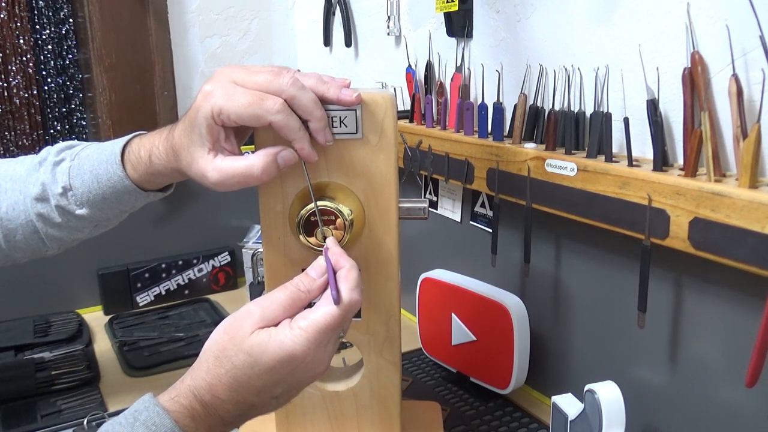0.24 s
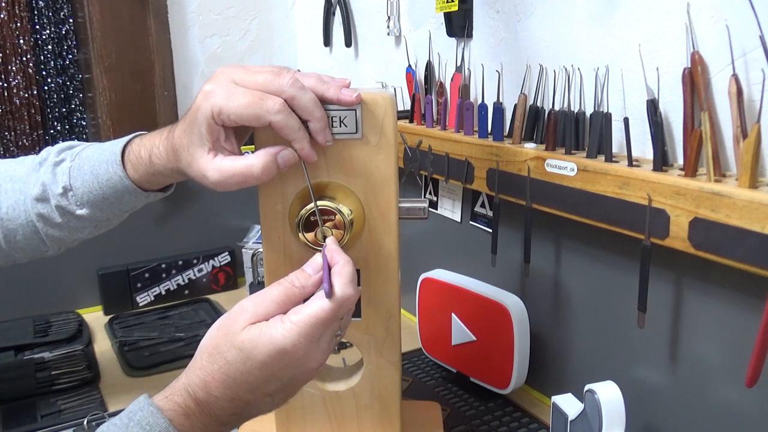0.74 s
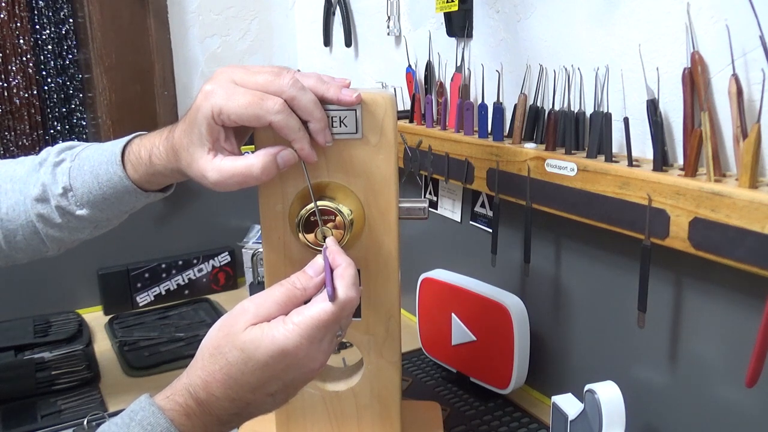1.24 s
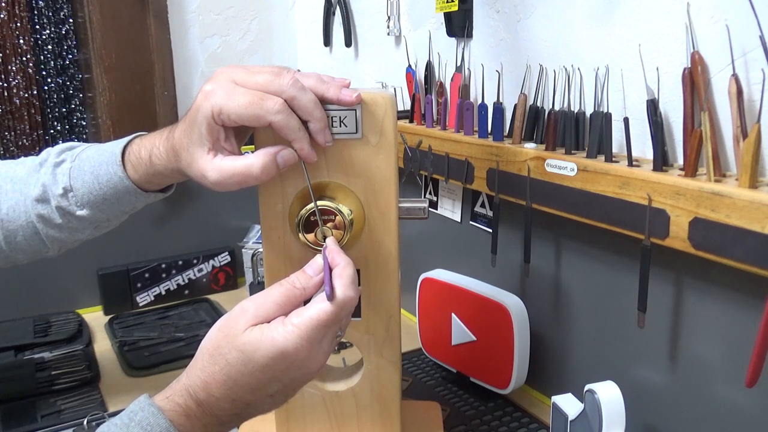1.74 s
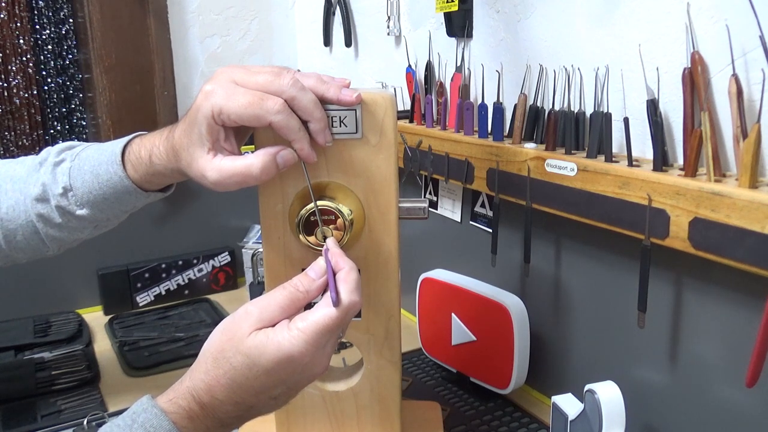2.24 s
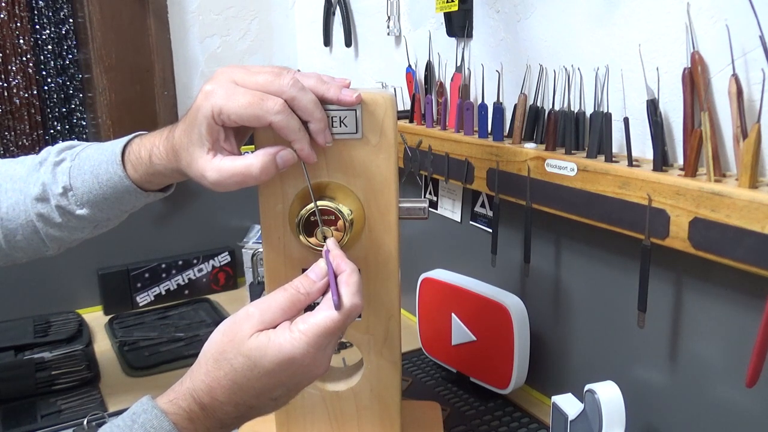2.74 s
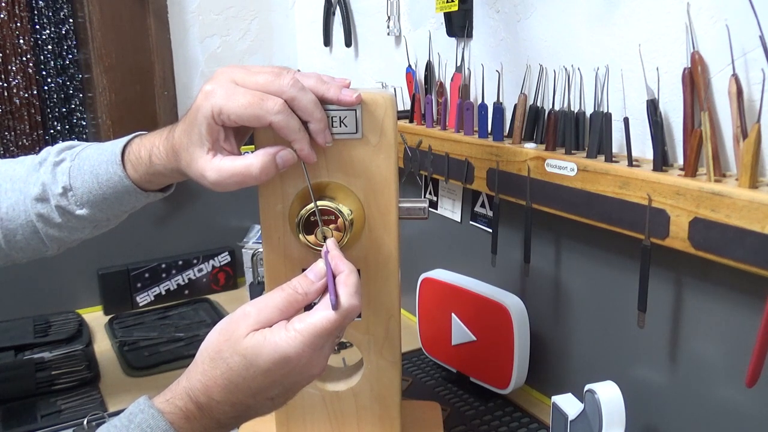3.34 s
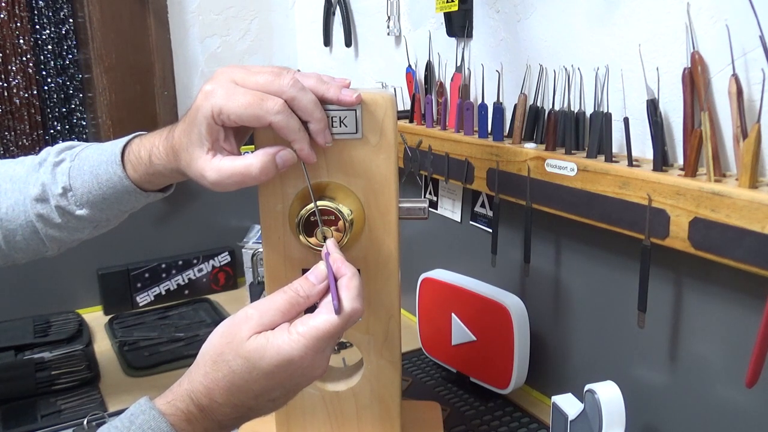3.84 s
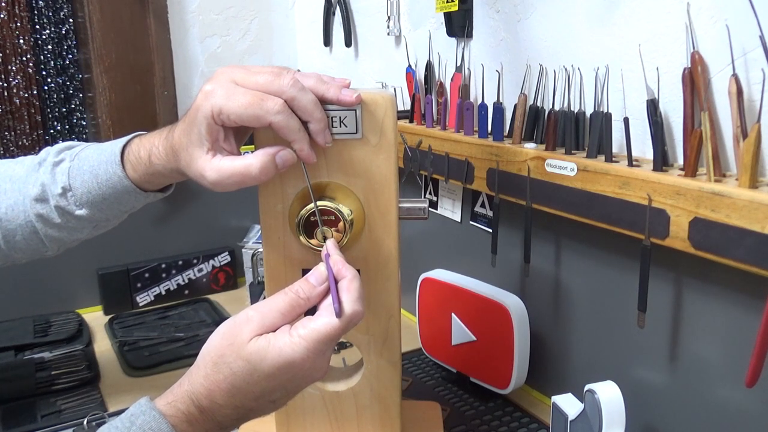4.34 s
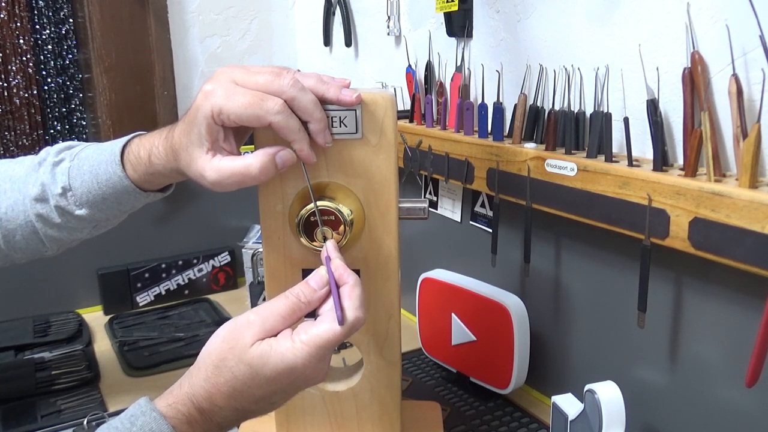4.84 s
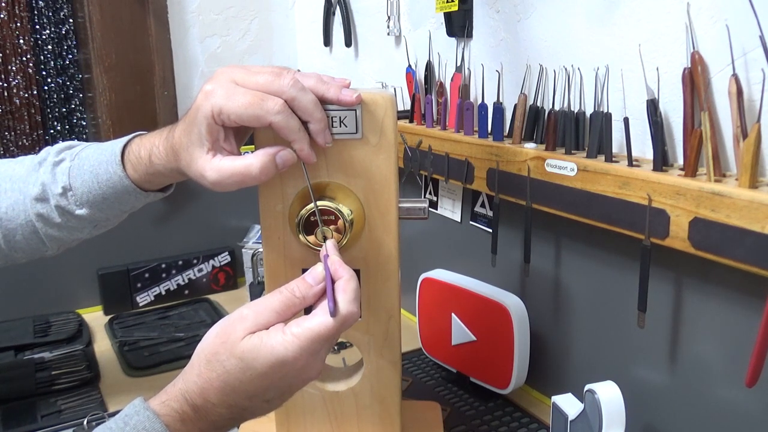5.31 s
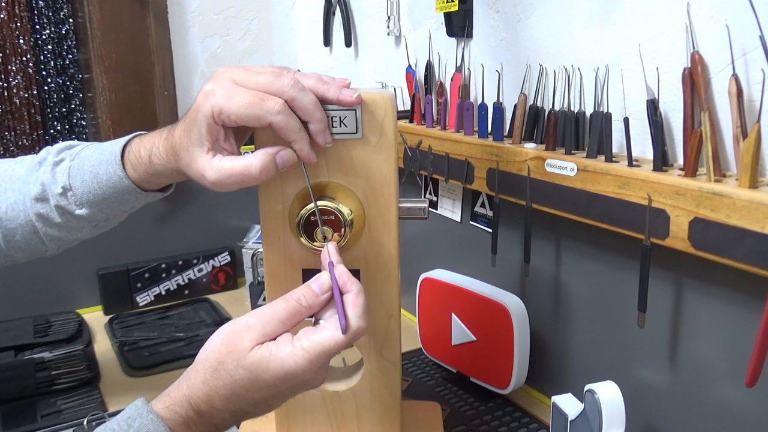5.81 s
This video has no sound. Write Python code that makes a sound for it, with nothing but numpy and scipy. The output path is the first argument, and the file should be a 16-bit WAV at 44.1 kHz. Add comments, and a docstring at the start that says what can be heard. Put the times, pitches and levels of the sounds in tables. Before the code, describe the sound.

A steel pick works the pins of a brass door lock in a wooden stand, close to one microphone in a small, fairly dry workshop. Faint room hiss runs throughout. A light, bright click comes at about 0.6 seconds, then four quick knocking clicks between 1.3 and 1.5 seconds. Each snap combines a short knock of the lock body with a very brief steel ring, and harder ones thump the stand. A soft knock at 2.4 seconds leads to a sharp click at 2.6 and a smaller one at 3. The pick rubs and scrapes faintly in the gaps, just before a stronger snap at 3.5 seconds. By far the loudest snap lands at 4.85 seconds. Afterwards the hiss drops a little and slowly recovers, with a few small clicks around 5.1 seconds and faint ticks near 5.8 and 6.

```python
"""A small workshop, one microphone close to a brass door lock in an upright wooden stand.
Room air hisses throughout. At 0.55 s a steel pick nudges a pin and the lock body knocks softly.
From 0.6 s pins snap: each knocks the body, rings the steel tools and thumps the stand.
From 2.3 s the pick also rubs and scrapes faintly between snaps. At 4.85 s comes the hardest snap:
the limiter ducks and recovers slowly, so the hiss and the last few clicks stay lower after it."""
import sys
import numpy as np
from scipy import signal
from scipy.fft import rfft, irfft, next_fast_len
from scipy.io import wavfile
from scipy.ndimage import uniform_filter1d

SR = 44100
rng = np.random.default_rng(int(sys.argv[2]) if len(sys.argv) > 2 else 0)


def unload_wav(signal):
    """Save mono or channel-first audio to the path in sys.argv[1] as 16-bit WAV at rate SR, clipped to [-1, 1]."""
    wavfile.write(
        sys.argv[1],
        SR,
        np.round(np.clip(np.atleast_2d(signal).T, -1, 1) * 32767).astype(np.int16),
    )


N = 267819
T = np.arange(SR // 3) / SR  # time inside one click or stroke
FREQS = np.fft.rfftfreq(len(T), 1 / SR)


def amp(db):
    """Decibels to gain."""
    return 10 ** (np.asarray(db) / 20)


def unit(x):
    """Scale to rms 1."""
    return x / np.sqrt(np.mean(x ** 2) + 1e-20)


def along(points, hz):
    """Read (f/Hz, value) points on a log frequency axis."""
    f, v = np.transpose(points)
    return np.interp(np.log(hz + 1), np.log(f + 1), v)


def coloured(x, points):
    """Causal (minimum-phase) filter through (f/Hz, gain/dB) points."""
    m = 2 * next_fast_len(len(x))
    gain = amp(along(points, np.fft.rfftfreq(m, 1 / SR)))
    cepstrum = irfft(np.log(gain), m)
    cepstrum[1:m // 2] *= 2
    cepstrum[m // 2 + 1:] = 0
    return irfft(rfft(x, m) * np.exp(rfft(cepstrum)), m)[:len(x)]


def add(track, s, sound):
    """Mix a sound into the track at time s."""
    part = track[max(round(s * SR), 0):][:len(sound)]
    part += sound[:len(part)]


def ring(modes, scatter_db, detune):
    """Damped modes, struck anew; neighbours swing in opposite senses, so the ring swells and beats."""
    sound = np.zeros(len(T))
    for k, (hz, db, t60) in enumerate(modes):
        decay = amp(db + scatter_db * rng.standard_normal() - 60 * T / t60)
        pitch_hz = hz * (1 + detune * rng.standard_normal())
        sound += (-1) ** k * decay * np.sin(2 * np.pi * pitch_hz * T)
    return sound


# spectrum of the workshop's air: f/Hz, relative level/dB
AIR_SPECTRUM = [(12, -41.5), (20, -5.5), (43, -3), (91, -0.5), (248, -3.5), (388, -5.5), (422, -6.5),
                (642, -8.5), (1000, -12.5), (1090, -13), (1220, -12), (1570, -15.5), (4060, -20),
                (14300, -24), (16000, -27.5)]
def room_air(level_db=-67.5):
    """Steady room tone at the microphone."""
    return amp(level_db) * unit(coloured(rng.standard_normal(N), AIR_SPECTRUM))


# reflections off the bench and near walls: delay/s, gain
REFLECTIONS = [(.0038, 0.42), (0.0115, .07), (0.0156, .12)]
# the workshop's diffuse tail: f/Hz, t60/s
ROOM_DECAY = [(150, 0.26), (800, 0.12), (1400, 0.16), (5000, 0.17), (12000, 0.13), (16000, 0.16)]
def in_room(x, wet_db):
    """At the microphone: direct sound, near walls and a short tail; rms 1 over the first 25 ms."""
    hz, t, noise = signal.stft(rng.standard_normal(len(T)), SR, nperseg=128)
    decay = amp(-60 * t / along(ROOM_DECAY, hz)[:, None])
    tail = signal.istft(noise * decay, SR, nperseg=128)[1][:len(T)]
    build_up = 1 - np.exp(-T / 0.0063)
    wet = signal.fftconvolve(x, tail * build_up)[:len(T)]
    near = x + sum(gain * np.interp(T - delay, T, x, left=0) for delay, gain in REFLECTIONS)
    heard = unit(near) + amp(wet_db) * unit(wet)
    return heard / np.sqrt(np.mean(heard[:SR // 40] ** 2))


# modes of the lock body in its stand: f/Hz, relative level/dB, t60/s
BODY_MODES = [(829, -12, 0.048), (865.6, -4, 0.015), (1052, -1, 0.015), (1258.4, -0.5, 0.048),
              (1388, -6, 0.031), (1430, -16, 0.031), (1567, -6, 0.028), (1670, -4.5, 0.0063),
              (1812, -16.5, 0.033), (2115, -20, 0.02)]
def body_knock(bass_db, upper_db):
    """The lock body: a soft contact wakes only its main resonance, a hard one all of them."""
    soft_db = min(upper_db, 0)  # the softer the contact, the faster the outer modes fall away
    low_db, high_db = bass_db + soft_db, upper_db + soft_db
    contact = [(520, low_db - 24), (680, low_db - 16.5), (810, low_db), (1040, bass_db), (1200, -0.55),
               (1400, 2.9), (1570, upper_db), (2200, high_db), (2900, high_db - 10.5),
               (6000, soft_db - 46.5)]
    body = ring(BODY_MODES, scatter_db=3.5, detune=0.0022)
    return in_room(coloured(body, contact), wet_db=-8.5)


# modes of the wooden stand: f/Hz, relative level/dB, t60/s
STAND_MODES = [(109, -1, 0.093), (145, -4, 0.18), (60, -18, 0.23)]
def stand_thump():
    """The stand rocks on the bench after a blow."""
    rocking = in_room(ring(STAND_MODES, scatter_db=3.5, detune=0.0091), wet_db=-8)
    return coloured(rocking, [(25, -13.5), (80, 2.5), (150, 0.5), (200, -11.5), (600, -38.5)])


def blow(knock_db, bass_db, upper_db):
    """One contact on the lock: the body knocks, and the heavier the blow the more the stand joins in."""
    thump_db = 1.3 * knock_db + 0.33 * bass_db - 31
    return amp(knock_db - 2.5) * body_knock(bass_db, upper_db) + amp(thump_db) * stand_thump()


# soft contacts on a pin: t/s, relative knock level/dB
PIN_NUDGES = [(0.553, -49), (0.751, -69), (1.769, -62), (2.1918, -54), (2.4206, -30.5), (2.896, -62),
              (4.082, -62), (5.155, -35), (5.757, -51.5)]
def nudges():
    """The pick nudges a pin, too softly to ring the steel."""
    track = np.zeros(N)
    for s, knock_db in PIN_NUDGES:
        add(track, s, blow(knock_db, bass_db=-12, upper_db=-11.5))
    return track


# modes of pick and tension tool: f/Hz, relative level/dB, t60/s
TOOL_MODES = [(2200, 2, 0.044), (2560, -4.5, .025), (3140, -8, .04), (3860, -6, 0.054), (3930, 2, 0.023),
              (4360, -7, 0.016), (4940, 1, 0.034), (5260, 3.5, .035), (5390, -7.5, 0.076),
              (5580, -4.5, 0.057), (5970, 5.5, 0.024), (5980, -7.5, 0.068), (6660, -1, 0.05),
              (7600, -3.5, 0.079), (7480, -1, 0.08), (8480, -5, 0.036), (9606, -1, 0.048),
              (9900, -7, 0.043), (10980, 1, 0.046), (11560, -1.5, 0.02), (12000, 5.5, 0.073),
              (11667, 1.5, 0.0083), (12400, -4, 0.075), (14300, -8.5, .02)]
# modes of the pick's free length: f/Hz, relative level/dB, t60/s
PICK_MODES = [(3780, -6, 0.035), (4580, 0, .03), (5500, -2, 0.013), (6000, 0, .03), (7030, -1.5, .04),
              (8250, -1.5, 0.065), (11150, -3, 0.029), (11800, -1, .04)]
def steel_ring(low_db, top_db, note_hz, note_t60_s=0.03, rise_s=0.0007):
    """A crack fills the room; the hand-damped tools ring, with a note set by where the pick touches."""
    contact = [(600, -58.5), (1100, -29), (1700, low_db - 4), (2300, low_db), (3900, low_db),
               (4600, 0.5), (8200, -2), (8700, top_db - 6), (9400, top_db + 1), (11500, top_db + 2),
               (14000, top_db - 0.5), (16000, top_db - 7.5)]
    # each point of contact wakes some parts of the treble and misses others
    uneven = np.column_stack([np.linspace(2000, 16000, 36), 3 * rng.standard_normal(36)])
    burst = amp(-60 * T / 0.003) + amp(-20 - 60 * T / 0.02)
    rise = 1 - np.exp(-T / rise_s)  # the tools swing up
    crack = coloured(rng.standard_normal(len(T)) * burst * rise, uneven)
    tools = unit(ring(TOOL_MODES, scatter_db=4, detune=0.0077))
    pick = unit(ring(PICK_MODES, scatter_db=3.5, detune=0.002))
    note = unit(ring([(note_hz, 0, note_t60_s)], scatter_db=0, detune=0.0023))
    ringing = (tools + amp(-5.5) * pick + amp(-4) * note) * rise
    crack_at_mic = in_room(coloured(crack, contact), wet_db=-4)
    ringing_at_mic = in_room(coloured(ringing, contact), wet_db=-7.5)
    return amp(-4) * crack_at_mic + amp(-3.5) * ringing_at_mic


# snapping pins, levels relative: t/s, knock level/dB, knock bass tilt/dB,
# steel level/dB, steel low tilt/dB, steel top tilt/dB, pick note f/Hz
PIN_SNAPS = [(0.6236, -36.5, -26, -36.5, 1.5, -5, 6480), (1.2855, -27.5, 4.5, -36.5, -1.5, 1.5, 3600),
             (1.3217, -21.5, -2.5, -47.5, 15, -14, 5480), (1.4710, -21.5, -3, -42, 8, -3.5, 5980),
             (1.5291, -36.5, 4.5, -38.5, -2.5, 1, 3634), (2.6175, -27, 3, -29, 1.5, -5, 5920),
             (3.0178, -34, -5.5, -40.5, -17, -6, 8260), (3.5408, -16, 7, -30, -0.5, -4.5, 4850),
             (4.8502, -7, 5.5, -15, 1.5, -4, 4547), (5.1125, -37.5, -19, -40, -9, -18, 4440),
             (5.1221, -37, -15, -49, -13, -11.5, 8100), (5.7821, -42.5, -15.5, -60.5, -6, -10.5, 7930),
             (6.0286, -55.5, 2, -43, 11, -6, 4890)]
def snaps():
    """A pin snaps under the pick and sounds both the lock and the tools."""
    track = np.zeros(N)
    for s, knock_db, bass_db, steel_db, low_db, top_db, note_hz in PIN_SNAPS:
        add(track, s, blow(knock_db, bass_db, upper_db=4.5))
        add(track, s, amp(steel_db) * steel_ring(low_db, top_db, note_hz))
    return track


def slide(length_s, spectrum):
    """One stroke of sliding steel: dense tiny slips, shaped by a gain for each frequency."""
    slips = rng.standard_normal(len(T)) * rng.exponential(1, len(T))
    friction = irfft(rfft(slips) * spectrum, len(T))
    stroke = np.sin(np.pi * np.clip(T / length_s, 0, 1))
    return unit(in_room(friction * stroke, wet_db=-6)) * np.sqrt(length_s / T[-1])


# the pick on one spot of the keyway: t/s, length/s, centre f/Hz, level/dB
PICK_RUBS = [(2.307, 0.16, 4650, -75.5), (2.938, 0.16, 1330, -59.5), (3.356, 0.053, 1830, -69),
             (3.456, 0.049, 635, -59), (3.892, .11, 659, -67), (5.887, 0.01, 4090, -54)]
def rubs(width_hz=60):
    """A rub wakes one resonance, which depends on where the pick touches."""
    track = np.zeros(N)
    for s, length_s, centre_hz, db in PICK_RUBS:
        resonance = np.exp(-0.5 * ((FREQS - centre_hz) / width_hz) ** 2)
        add(track, s, amp(db) * slide(length_s, resonance))
    return track


# the pick moving on to the next pin: t/s, length/s, level/dB
PICK_SCRAPES = [(3.447, 0.088, -53.5), (5.09, .03, -53.5), (5.305, 0.023, -71), (5.885, 0.011, -62.5)]
# spectrum of the scraped keyway: f/Hz, relative level/dB
KEYWAY_SPECTRUM = [(400, -26), (900, -5), (1700, 2.5), (2800, -5.5), (4000, -11.5), (5400, -1.5),
                   (7500, -21.5), (14000, -30.5)]
def scrapes():
    """A scrape wakes the whole keyway."""
    track = np.zeros(N)
    keyway = amp(along(KEYWAY_SPECTRUM, FREQS))
    for s, length_s, db in PICK_SCRAPES:
        add(track, s, amp(db) * slide(length_s, keyway))
    return track


def scene():
    """The lock on the workshop bench, close to one microphone."""
    return (snaps() + nudges() + rubs() + scrapes() + room_air())[None]


def limiter(x, ceiling_db, max_cut_db, recover_db_per_s):
    """Ducks at once when the 20 ms level passes the ceiling, then lets the gain creep back."""
    level_db = 10 * np.log10(np.abs(uniform_filter1d(x ** 2, SR // 50)) + 1e-12)
    over_db = np.clip(level_db - ceiling_db, 0, max_cut_db)
    creep_db = recover_db_per_s * np.arange(N) / SR
    cut_db = np.maximum.accumulate(over_db + creep_db, axis=-1) - creep_db
    return x * amp(-cut_db)


def record(dry):
    """Behind the microphone: the limiter, then the recorder's steep band limit."""
    limited = limiter(dry, ceiling_db=-14.5, max_cut_db=6.5, recover_db_per_s=2.5)
    m, top_hz = next_fast_len(N + SR // 2), 15900
    lowpass = 1 / (1 + (np.fft.rfftfreq(m, 1 / SR) / top_hz) ** 120)
    return irfft(rfft(limited, m) * lowpass, m)[..., :N]


dry = scene()
out = record(dry)
unload_wav(out)
```